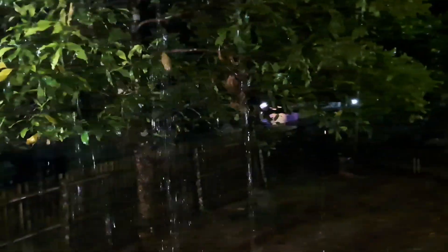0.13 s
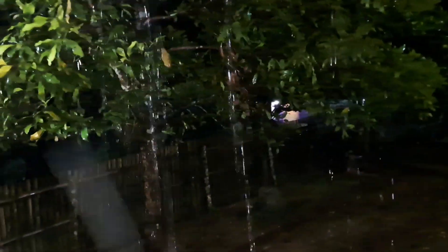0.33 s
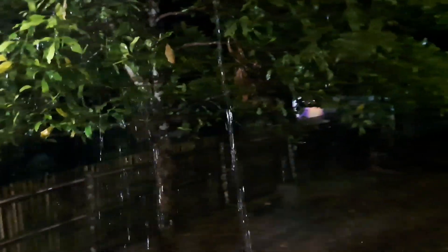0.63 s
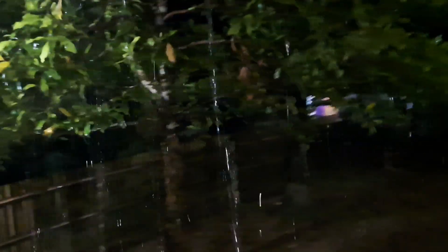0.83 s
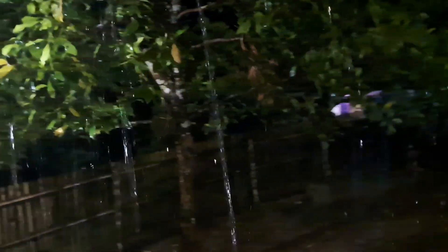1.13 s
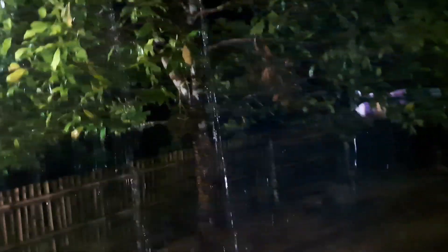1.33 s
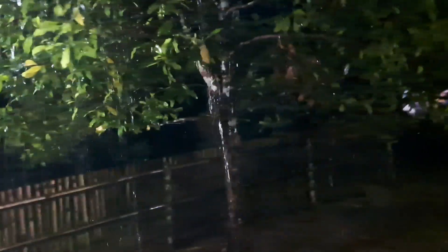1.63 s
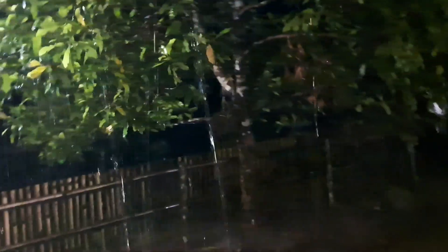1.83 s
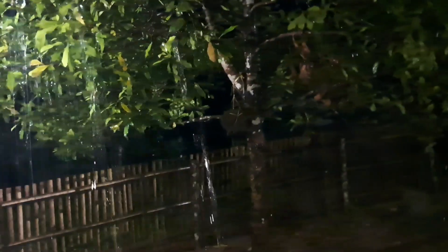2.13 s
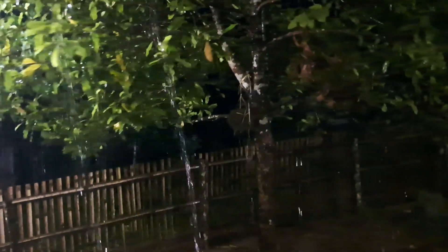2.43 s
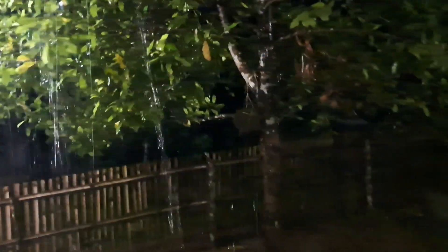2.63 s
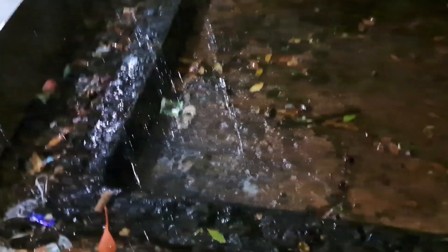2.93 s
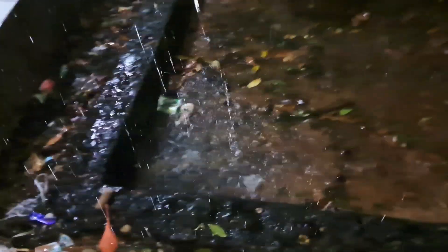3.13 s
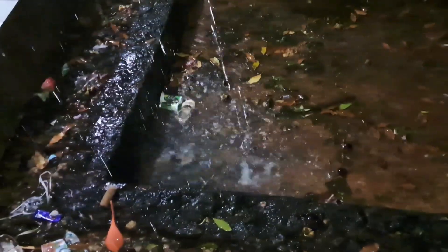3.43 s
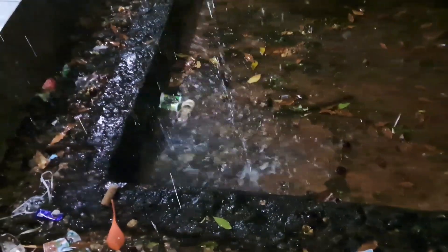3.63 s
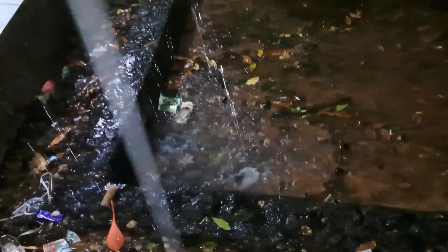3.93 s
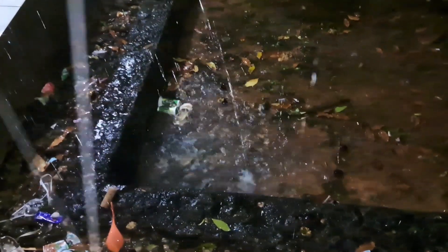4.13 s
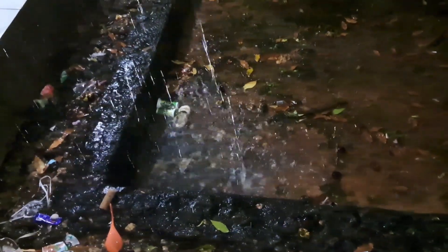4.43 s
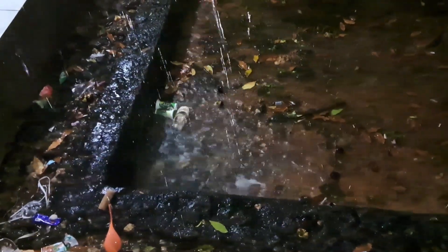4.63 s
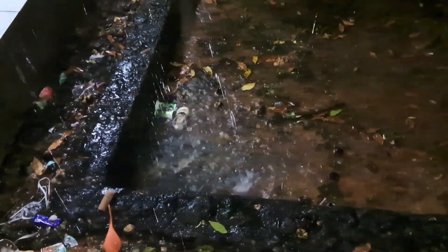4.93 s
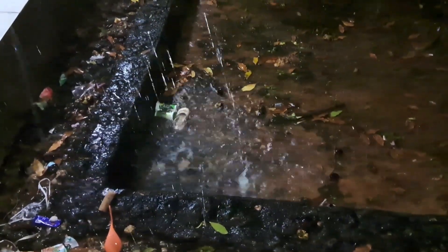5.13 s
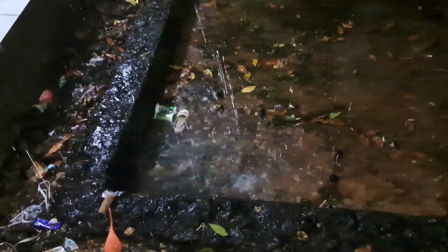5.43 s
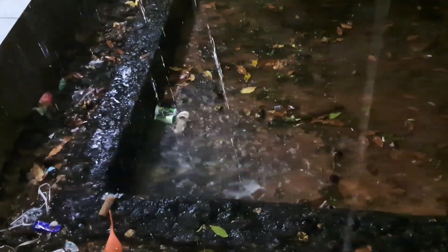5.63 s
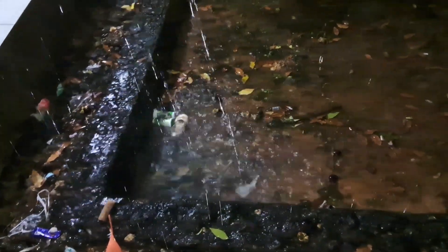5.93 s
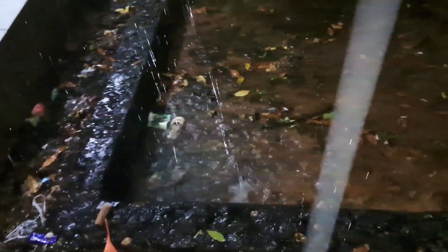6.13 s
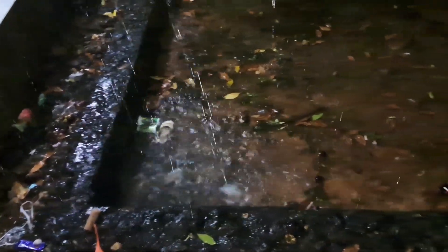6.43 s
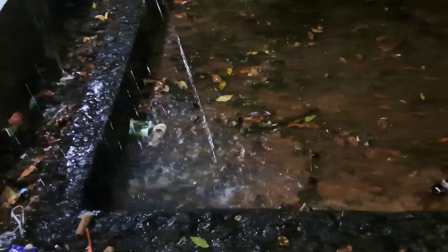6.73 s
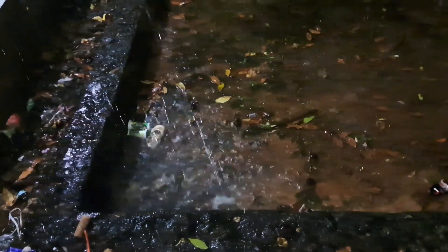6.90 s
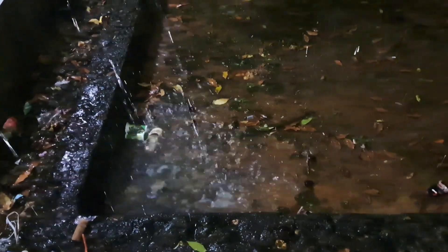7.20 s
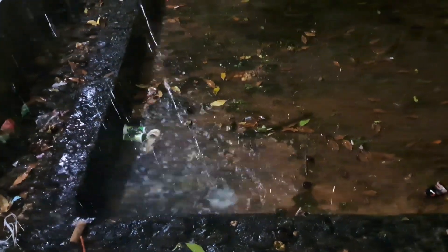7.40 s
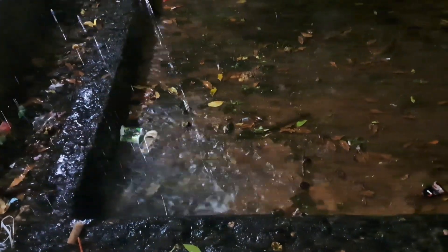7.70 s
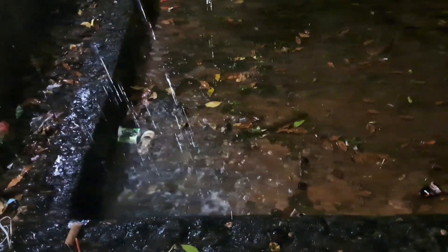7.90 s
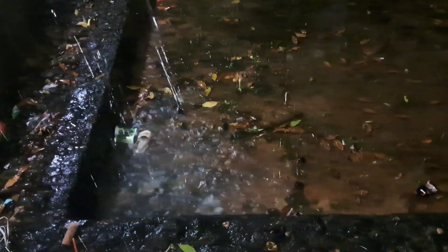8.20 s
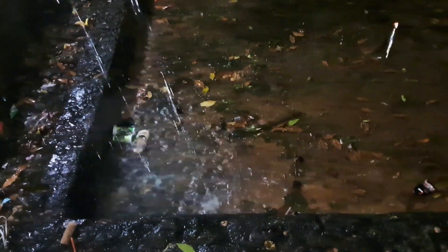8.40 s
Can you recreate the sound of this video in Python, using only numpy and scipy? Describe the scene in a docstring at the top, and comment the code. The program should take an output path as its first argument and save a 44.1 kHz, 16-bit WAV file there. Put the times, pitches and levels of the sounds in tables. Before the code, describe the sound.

Outdoors at night, heavy rain falls steadily on trees, a wide bright hiss with nearby drops, soft plops and a faint low drone behind. Near three seconds the sound stops abruptly for under half a second, then fades quickly back in close to a puddle, where streams of roof water splatter and slap on wet concrete, leaning slightly right.

```python
"""Heavy night rain on trees is heard first, over a low drone; the sound drops out for a moment,
then fades back in beside a puddle on wet concrete, a little to the right.
Ropes of water fall from a roof edge and break up: filtered noise and damped rings make the wash,
decaying resonances the slaps and plops, noise bursts the drops, and delayed copies the reflections."""
import sys
import numpy as np
from scipy import signal
from scipy.fft import rfft, irfft, next_fast_len
from scipy.io import wavfile
from scipy.ndimage import uniform_filter1d, map_coordinates

SR = 44100
rng = np.random.default_rng(int(sys.argv[2]) if len(sys.argv) > 2 else 0)


def dump_mix(stems):
    """Bounce the given channels to the path in sys.argv[1] as a 16-bit WAV at rate SR."""
    frames = np.atleast_2d(stems).T  # one column per channel
    limited = np.clip(frames, -1, 1)  # hard clip at full scale
    pcm = np.round(limited * 32767).astype(np.int16)
    wavfile.write(sys.argv[1], SR, pcm)


N = 377496

# Far low drone: its course [t/s, level/dB] and its spectrum [f/Hz, relative level/dB]
DRONE_LEVEL = [(0, -68), (.8, -58), (1.1, -49), (1.6, -65), (1.9, -50), (2.3, -50.5), (2.9, -50)]
DRONE_SPECTRUM = [(50, -42), (85, -12), (120, 0), (138, 1), (165, -14), (260, -52.5)]
# Spectrum of the low gurgle in each direction [f/Hz, relative level/dB]
GURGLE_TREES = [(20, -44.5), (45, -11.5), (68, -7), (100, -13), (138, -3), (190, -7), (290, 2), (450, -1),
                (720, 0.5), (980, -4), (1500, -22.5), (3000, -58.5)]
GURGLE_PUDDLE = [(20, -42), (45, -18), (68, -7.5), (100, -6), (190, -6), (305, 1), (430, -1.5), (720, -1.5),
                 (980, -3), (1500, -28), (3000, -60)]
# Nearly even flow of water in each direction [t/s, splatter level/dB, spray level/dB], before trims
FLOW_TREES = [(0, -35.2, -33.5), (1.3, -33.8, -32.5), (2.1, -35, -29.5), (2.9, -33, -31.5)]
FLOW_PUDDLE = [(3.4, -31.5, -31.5), (5, -31.5, -31.6), (8.5, -31, -31.5)]
# Colour of the splashing in each direction [f/Hz, relative level/dB]
COLOUR_TREES = [(530, -35), (900, -6), (1120, -2.5), (1530, -4), (1940, -3.5), (2190, -3.5), (3170, -9),
                (5500, -8), (6590, -8), (7700, -5.5), (9210, -9.5), (12600, -5), (15800, -11.5)]
COLOUR_PUDDLE = [(530, -21), (900, 0), (1120, 1.5), (1420, 4), (1560, 2.5), (2880, 4.5), (4330, -5),
                 (6910, -6.5), (7980, -8), (9660, -7.5), (11700, -10.5), (15100, -10), (15800, -31)]
# Bands in which splatter and spray lie [f/Hz, relative level/dB]
SPLATTER_BAND = [(300, -64), (650, -5.5), (1050, -3.5), (3600, -2), (5200, -5), (9000, -55)]
SPRAY_BAND = [(1500, -44.5), (3400, -8), (5000, -3.5), (15800, -1)]
# Stereo balance in each direction [f/Hz, left minus right level/dB]
LEAN_TREES = [(700, 0), (2400, 0), (4400, 0), (8100, -1.5), (13000, -4), (15500, 8)]
LEAN_PUDDLE = [(700, 0.5), (1300, 1), (2000, -4.5), (3300, -10), (5000, -1), (7000, -4.5), (9300, -8),
               (12500, 1), (15500, -1)]
# Likeness of the two ears in diffuse sound [f/Hz, correlation/1]
EAR_CORRELATION = [(60, .9), (150, 0.92), (290, 0.91), (640, 0.57), (1400, -0.02), (2200, 0.2),
                   (3000, -0.07), (6000, 0.00059)]
# Reflections from ground, kerb, wall and roof [nominal delay/s, relative level/dB]
REFLECTIONS = [(.0078, -2.5), (0.011, -10.5), (.016, -9.5), (.023, -10.5), (.032, -16.5)]
# Diffuse echo under the roof [f/Hz, time to fall by 60 dB/s]
EAVES_DECAY = [(200, 0.31), (2000, 0.23), (12000, 0.024)]
# Big drops bursting close by [t/s, relative level/dB] and their spectrum [f/Hz, relative level/dB]
NEAR_DROPS = [(0.449, -9.5), (0.698, -14.5), (1.053, -16), (1.2239, -12), (1.455, -16), (1.532, -13),
              (1.884, -9), (2.386, -13), (2.497, -11.5), (2.556, -7.5), (3.661, -11.5), (4.9524, -13.5),
              (5.0236, -15), (5.3508, -6), (6.0764, -6.5), (6.085, -10), (6.654, -14), (7.14, -12.5),
              (7.828, -16)]
DROP_SPECTRUM = [(300, -28), (1500, -6), (4000, -6), (8000, 4.5), (11000, -2), (15800, -3)]
# Low plops of water, before and after the turn [t/s, relative level/dB, pitch f/Hz]
LOW_PLOPS = [(0.067, -21.5, 685), (0.129, -30.5, 245), (0.274, -27, 353), (0.467, -19.5, 673),
             (0.745, -22.5, 640), (1.344, -24.5, 560), (1.893, -23.5, 307), (3.643, -25, 336),
             (4.287, -24.5, 584), (5.805, -25.5, 570), (5.839, -28.5, 262), (6.592, -27.5, 239.3),
             (6.954, -26, 325), (7.236, -25.5, 345), (7.63, -19.5, 585), (7.783, -19, 606)]
# Biggest lumps of water slapping the concrete [t/s, relative level/dB, centre f/Hz]
BIG_SLAPS = [(0.0914, -22, 1016), (0.529, -22, 1240), (1.0301, -18, 1670), (1.227, -14.5, 1260),
             (1.4544, -12.5, 2150), (1.5308, -14, 4000), (2.0092, -16, 2320), (2.1355, -9.5, 1880),
             (2.3103, -14, 2460), (2.5289, -18, 1970), (3.4351, -12, 2750), (3.678, -11, 2440),
             (4.156, -18.5, 1360), (4.1598, -12, 2873), (4.8267, -12, 2820), (4.9694, -16, 3241),
             (5.1696, -14.5, 2230), (5.341, -18, 1983), (5.5314, -17, 2667), (5.724, -15, 2968),
             (5.8108, -15, 2220), (5.885, -12.5, 2940), (6.297, -14.5, 2110), (6.545, -14, 1490),
             (7.1468, -12, 2714), (7.3905, -11, 1900), (7.5524, -15, 2376), (7.8042, -14.5, 1980),
             (8.105, -13.5, 1734), (8.1687, -14, 2930), (8.315, -14, 2977), (8.5047, -13, 2337)]
# Loss and return of the whole sound [t/s, gain/1]
FADE = [(0, 0.98), (2.897, 0.86), (2.901, 0.031), (2.915, 0), (3.273, 0), (3.3, 0.3), (3.35, 0.66),
        (3.42, 0.9)]

TURN_S = 3.1  # trees before, puddle after
TOP_HZ = 16100  # upper band limit
SURGES_PER_S, SURGE_DB = 9, 0.69  # slight wavering of the ropes of water: knot rate, depth
DROP_LEAN_DB = -2.5  # left minus right
STRAY_PER_S, STRAY_DB, STRAY_SCATTER_DB = 5.4, -17, 4  # lesser drops: rate, mid level, plus or minus
SMALL_PER_S, SMALL_DB, SMALL_SCATTER_DB = 5, -21.5, 2  # lesser slaps: rate, mid level, plus or minus
SMALL_LOW_HZ, SMALL_HIGH_HZ = 1400, 3500


def amp(db):
    """Logarithmic level: decibels become an amplitude ratio."""
    return 10 ** (np.asarray(db) / 20)


def unit(x):
    """Normalisation: scale to a root-mean-square of 1."""
    return x / np.sqrt(np.mean(x ** 2) + 1e-20)


def along(points, hz):
    """Logarithmic interpolation: read (f, value) points on a log frequency axis."""
    f, value = np.transpose(points)
    return np.interp(np.log(hz + 1), np.log(f + 1), value)


def curves(rows):
    """Linear interpolation: one value per sample for each column after the time."""
    s, *columns = np.transpose(rows)
    return [np.interp(np.arange(N) / SR, s, column) for column in columns]


def wobble(rate):
    """Slow modulation: a smooth random curve through `rate` knots a second."""
    knots = rng.standard_normal(int(N * rate / SR) + 4)
    return map_coordinates(knots, [np.arange(N) * rate / SR])


def filtered(x, response):
    """Linear filtering: multiply the spectrum by a response of frequency."""
    size = next_fast_len(x.shape[-1] + 8192)  # padding holds the filter's tail
    spectrum = rfft(x, size) * response(np.fft.rfftfreq(size, 1 / SR))
    return irfft(spectrum, size)[..., :x.shape[-1]]


def sides(lean_db):
    """Intensity panning: left and right gains of constant total power."""
    gains = amp(np.array([lean_db, -lean_db]).reshape(2, -1) / 2)
    return gains / np.sqrt(np.mean(gains ** 2, axis=0))


def spread(pair):
    """Interaural coherence: two unrelated signals mix to a shared bass and a wide treble."""
    def mid_side_gains(hz):
        angle = np.arccos(np.clip(along(EAR_CORRELATION, hz), -1, 1)) / 2
        return np.array([np.cos(angle), np.sin(angle)])

    mid, side = filtered(pair, mid_side_gains)
    return np.array([mid + side, mid - side])


def add(track, s, sound):
    """Superposition: mix a stereo sound in at time s."""
    start = int(np.clip(round(s * SR), 0, N - 1))
    track[:, start:start + sound.shape[1]] += sound[:, :N - start]


def hiss():
    """Law of large numbers: countless far drops merge into stereo white noise."""
    return rng.standard_normal((2, N))


def crackle(rate, length):
    """Random impulse process: tiny droplets land as sparse clicks, `rate` a second in each ear."""
    landed = lambda: rng.random((2, length)) < rate / SR
    return unit(rng.standard_normal((2, length)) * landed())


def grains(rate, low_hz, high_hz, cycles, scatter_db, size):
    """Damped oscillation: two streams of randomly timed rings, at most `size` samples long."""
    when, pitch, strength, life = rng.random((int(2 * rate * N / SR), 4)).T[:, :, None]
    hz = low_hz * (high_hz / low_hz) ** pitch
    phase = hz * np.arange(size) / SR  # in cycles
    gain = amp(-scatter_db * np.log(np.maximum(strength, .01))) * hz / high_hz
    decay = np.exp(-phase / (cycles * (.5 + life)))  # `cycles` is the mean life
    rings = gain * np.sin(2 * np.pi * phase) * decay
    index = (when * 2 * N).astype(int) + np.arange(size)
    return unit(np.bincount(index.ravel(), rings.ravel(), 2 * N)[:2 * N].reshape(2, N))


def bursts(rate, life, scatter_db):
    """Exponential decay: each lump starts spatter at once, whose power dies away over `life` seconds."""
    when, strength = rng.random((int(rate * N / SR), 2)).T
    power = amp(-scatter_db * np.log(np.maximum(strength, .02))) ** 2
    hits = np.bincount((when * N).astype(int), power, N)
    return unit(np.sqrt(signal.lfilter([1], [1, -np.exp(-1 / (life * SR))], hits)))


def hum():
    """Band-limited noise: a faint low drone swells somewhere beyond the trees."""
    level_db, = curves(DRONE_LEVEL)
    drone = filtered(spread(hiss()), lambda hz: amp(along(DRONE_SPECTRUM, hz)))
    return amp(level_db) * unit(drone)


def gurgle(colour):
    """Bubble resonance: low bubbles churn in water under the drumming of distant rain."""
    bubbles = grains(rate=220, low_hz=167.0, high_hz=960, cycles=1.4, scatter_db=2, size=1000)
    water = spread(hiss() + amp(-16) * bubbles)
    return unit(filtered(water, lambda hz: amp(along(colour, hz))))


def patter(patchy_db):
    """Spectral modulation: far splashes tint a few hundred hertz for a few hundredths of a second."""
    z = signal.stft(hiss(), nperseg=256)[2]
    field = uniform_filter1d(rng.standard_normal(z.shape[1:]), size=4, axis=0)  # over frequency
    field = uniform_filter1d(field, size=7, axis=1)  # over time
    tinted = signal.istft(z * amp(patchy_db * unit(field)), nperseg=256)[1]
    return unit(tinted[:, :N])


def spray():
    """Impulsive excitation: splashes throw showers of fine droplets; raindrops tick among them."""
    showers = bursts(rate=120, life=0.029, scatter_db=3.0) * crackle(12000, N)
    ticks = bursts(rate=220, life=.0007, scatter_db=3.0) * hiss()
    return showers + amp(-3.5) * ticks + amp(1) * patter(patchy_db=3.0)


def splatter():
    """Cavity ringing: ropes of water break into clumps of pops, single splats and small bubbles."""
    pops = grains(rate=700, low_hz=794, high_hz=4600, cycles=1.83, scatter_db=1.5, size=200)
    splats = grains(rate=110, low_hz=913, high_hz=3460, cycles=3.6, scatter_db=3.0, size=450)
    bubbles = grains(rate=110, low_hz=889, high_hz=3488, cycles=16, scatter_db=2, size=1600)
    clumps = bursts(rate=150, life=0.026, scatter_db=2.0) * (hiss() + amp(-3) * pops)
    return clumps + amp(-10) * splats + amp(-8) * bubbles + amp(7) * patter(patchy_db=1.5)


def downpour(flow, colour, lean, splatter_db, spray_db):
    """Common modulation: splatter and spray from one direction surge together."""
    flow_splatter_db, flow_spray_db = curves(flow) + SURGE_DB * wobble(SURGES_PER_S)

    def heard(x, band):
        def response(hz):
            return amp(along(colour, hz) + along(band, hz)) * sides(along(lean, hz))
        return unit(filtered(spread(x), response))

    body = amp(flow_splatter_db + splatter_db) * heard(splatter(), SPLATTER_BAND)
    return body + amp(flow_spray_db + spray_db) * heard(spray(), SPRAY_BAND)


def eaves(x):
    """Reverberation: wall and roof answer with a short diffuse tail."""
    hz, t, z = signal.stft(rng.standard_normal((2, SR // 3)), SR, nperseg=256)
    decay = amp(-60 * t / along(EAVES_DECAY, hz)[:, None])
    tail = signal.istft(z * decay, SR, nperseg=256)[1]
    return signal.fftconvolve(x, tail / np.linalg.norm(tail[0]), axes=1)[:, :N]


def rebound(sound, wall_db):
    """Early reflection: nearby surfaces repeat a splash, with delays varying from splash to splash."""
    out = sound.copy()
    for delay, db in REFLECTIONS:
        lags = (SR * delay * rng.uniform(.8, 1.2) + rng.uniform(0, 20, 2)).astype(int)
        for ear, lag in enumerate(lags):
            out[ear, lag:] += amp(db + wall_db) * sound[ear, :-lag]
    return out


def pop(hz, cycles):
    """Cavity resonance: a ring swells for `cycles`, then dies; the two ears are slightly out of phase."""
    turns = hz * np.arange(SR // 10) / SR
    age = turns / cycles
    envelope = age ** 2 * np.exp(2 * (1 - age))  # peaks at 1 when age is 1
    ear_phase = rng.normal(0, 1, (2, 1)) * hz / 2200
    return envelope * np.sin(2 * np.pi * turns + ear_phase)


def stray_drops():
    """Random arrival: lesser drops among the big ones, as rows of t/s, level/dB."""
    when, size = rng.random((int(STRAY_PER_S * N / SR), 2)).T
    level_db = STRAY_DB + STRAY_SCATTER_DB * (2 * size - 1)
    return list(zip(when * N / SR, level_db))


def drops(crack_at=0.00062, crack_width=0.00063, mist_life=0.033, mist_db=-19):
    """Impact noise: a near drop cracks on the hard ground and scatters into mist (times in seconds)."""
    out, t = np.zeros((2, N)), np.arange(SR // 10) / SR
    crack = np.exp(-((t - crack_at) / crack_width) ** 2)
    shape = crack + amp(mist_db) * np.exp(-t / mist_life)
    for s, db in NEAR_DROPS + stray_drops():
        burst = shape * rng.standard_normal((2, len(t)))
        add(out, s, amp(db) * sides(DROP_LEAN_DB) * rebound(burst, wall_db=-3.5))
    return filtered(out, lambda hz: amp(along(DROP_SPECTRUM, hz)))


def plops(swell=0.002):
    """Cavity resonance: plunging water opens low-pitched cavities, each peaking after `swell` seconds."""
    out = np.zeros((2, N))
    for s, db, hz in LOW_PLOPS:
        add(out, s, amp(db) * rebound(pop(hz, hz * swell), wall_db=0.0))
    return out


def small_slaps():
    """Random arrival: lesser lumps among the big ones, as rows of t/s, level/dB, f/Hz."""
    when, size, pitch = rng.random((int(SMALL_PER_S * N / SR), 3)).T
    level_db = SMALL_DB + SMALL_SCATTER_DB * (2 * size - 1)
    hz = SMALL_LOW_HZ * (SMALL_HIGH_HZ / SMALL_LOW_HZ) ** pitch
    return list(zip(when * N / SR, level_db, hz))


def slaps(cycles=1.54, lead=.004, splash_life=0.023, splash_db=-13, width=0.61, nearness=1.5):
    """Damped resonance: droplets lead a lump by `lead` seconds; it pops, and more fall around its pitch."""
    out, t = np.zeros((2, N)), np.arange(SR // 10) / SR
    shower = np.exp(-t / splash_life) * (1 - np.exp(-t / lead))
    for s, db, hz in BIG_SLAPS + small_slaps():
        # same side as the splatter of that pitch, but further over
        lean_db = nearness * along(LEAN_TREES if s < TURN_S else LEAN_PUDDLE, hz)
        band = signal.butter(2, [hz / (1 + width), hz * (1 + width)], "band", fs=SR)
        splash = signal.lfilter(*band, shower * crackle(2500, len(t)))
        splash *= np.linalg.norm(shower) / np.linalg.norm(splash, axis=1, keepdims=True)
        # the cavity is lopsided: a second, lower ring
        smack = pop(hz, cycles) + 0.27 * pop(hz * 0.745, cycles * 0.97)
        add(out, s - lead, amp(db + splash_db) * sides(lean_db) * splash)
        add(out, s, amp(db) * sides(lean_db) * rebound(smack, wall_db=-2.0))
    return out


def scene():
    """Superposition: steady water from two directions in turn, with the nearest splashes on top."""
    trees = downpour(FLOW_TREES, COLOUR_TREES, LEAN_TREES, splatter_db=4.5, spray_db=4.0)
    trees = trees + amp(-37.5) * gurgle(GURGLE_TREES) + hum()
    puddle = downpour(FLOW_PUDDLE, COLOUR_PUDDLE, LEAN_PUDDLE, splatter_db=3.0, spray_db=4.0)
    puddle = puddle + amp(-37.5) * gurgle(GURGLE_PUDDLE)
    facing_trees = np.arange(N) < TURN_S * SR
    near = amp(2.0) * slaps() + amp(1.5) * plops() + amp(-1.0) * drops()
    return np.where(facing_trees, trees, puddle) + near + amp(-9.0) * eaves(near)


def record(dry):
    """Gain and band limiting: the sound cuts out and fades back in; nothing passes above TOP_HZ."""
    gain, = curves(FADE)
    faded = dry * np.clip(gain, 0, None)
    return filtered(faded, lambda hz: np.clip((TOP_HZ - hz) / 400, 0, 1))


dry = scene()
out = record(dry)
dump_mix(out)
```